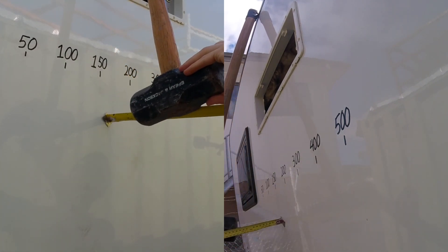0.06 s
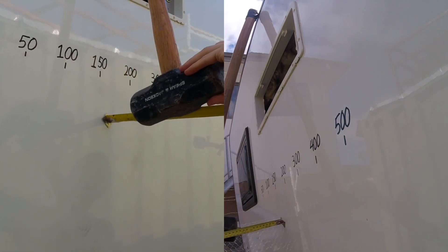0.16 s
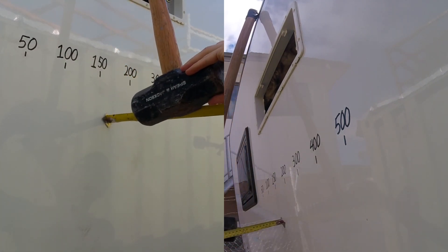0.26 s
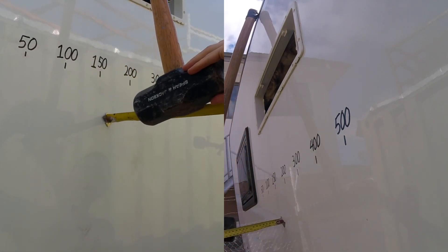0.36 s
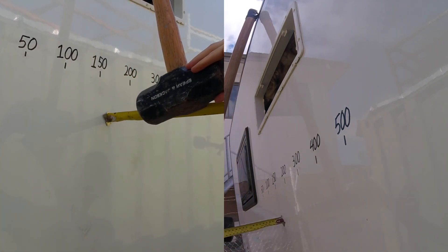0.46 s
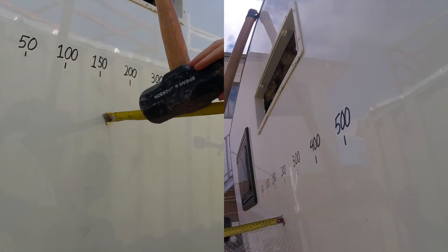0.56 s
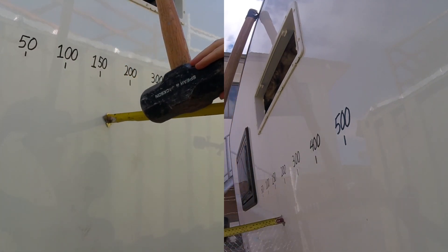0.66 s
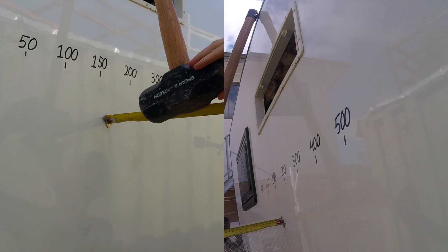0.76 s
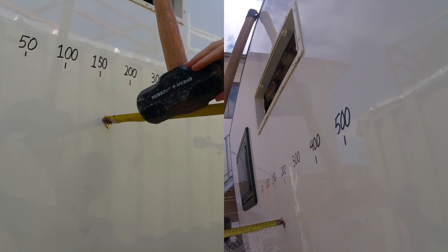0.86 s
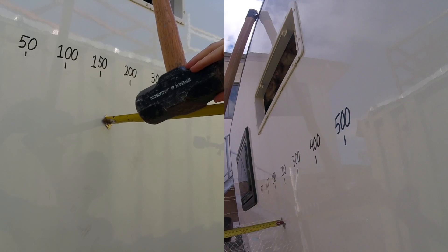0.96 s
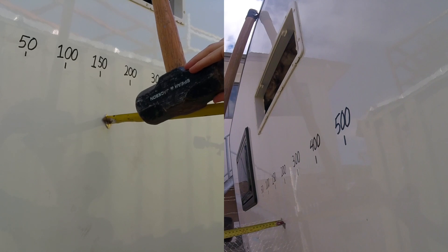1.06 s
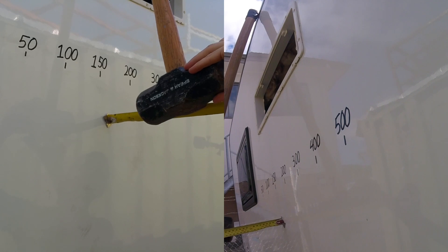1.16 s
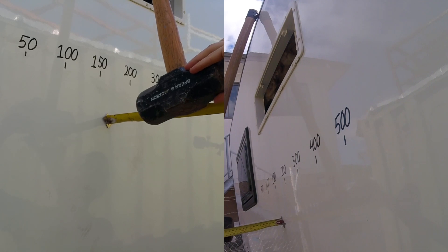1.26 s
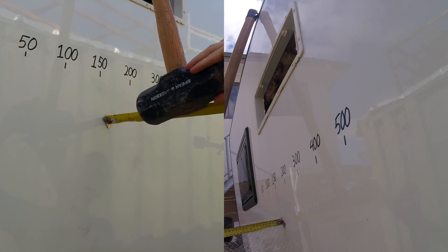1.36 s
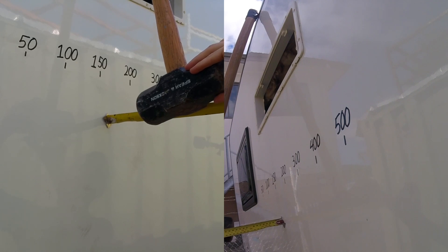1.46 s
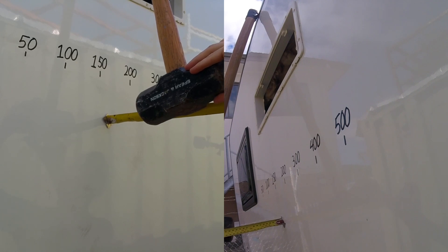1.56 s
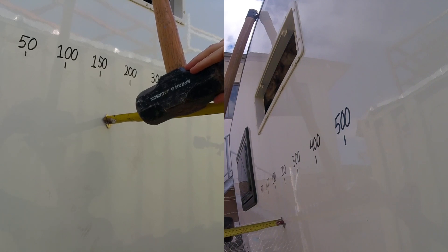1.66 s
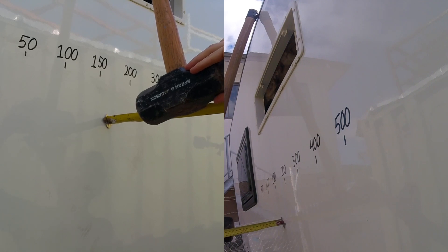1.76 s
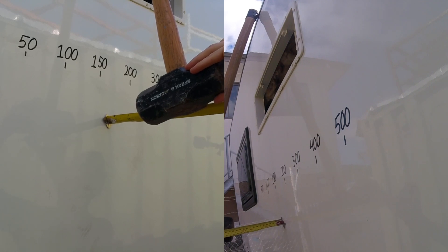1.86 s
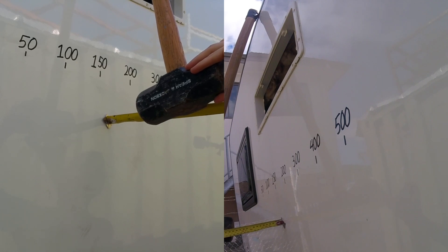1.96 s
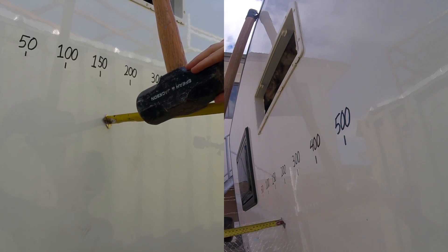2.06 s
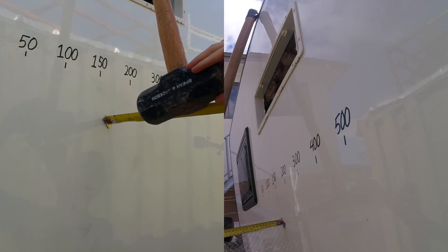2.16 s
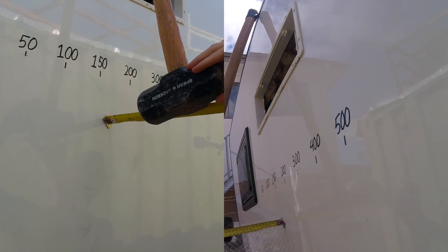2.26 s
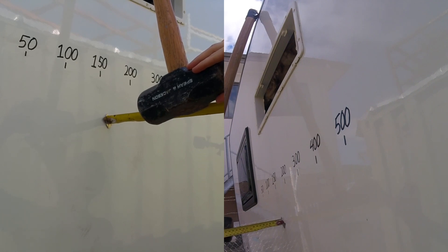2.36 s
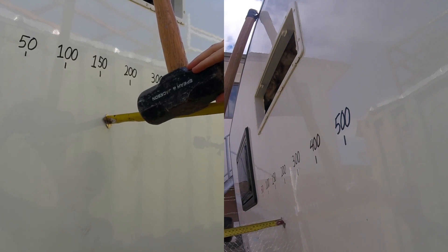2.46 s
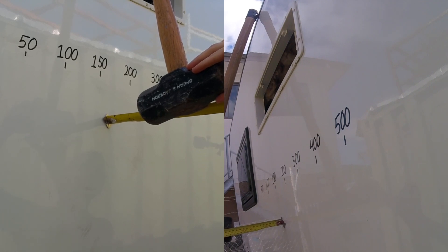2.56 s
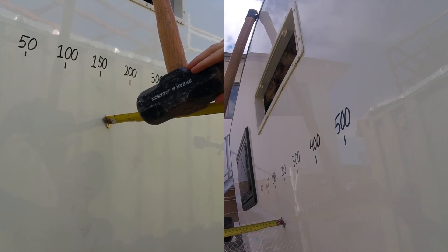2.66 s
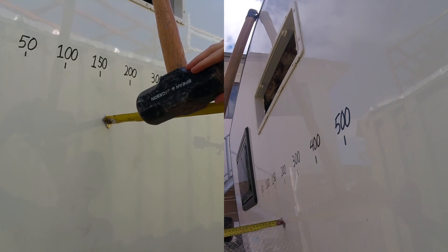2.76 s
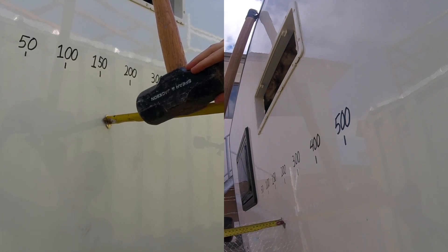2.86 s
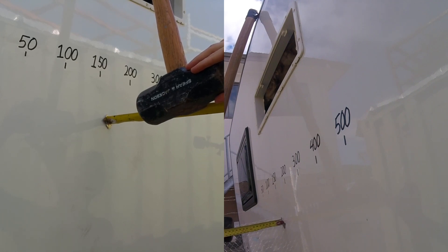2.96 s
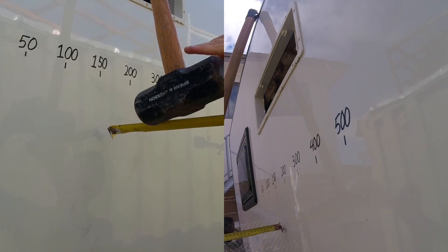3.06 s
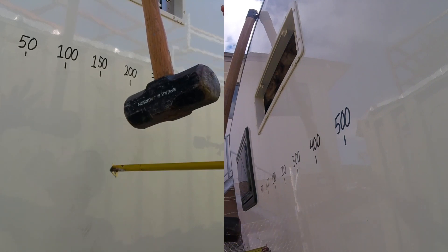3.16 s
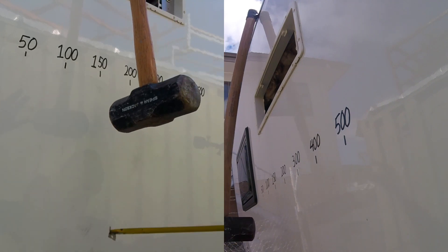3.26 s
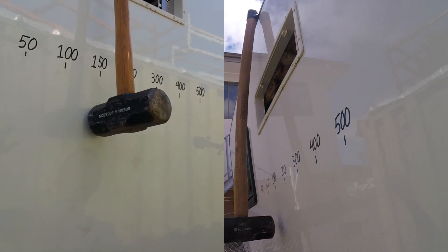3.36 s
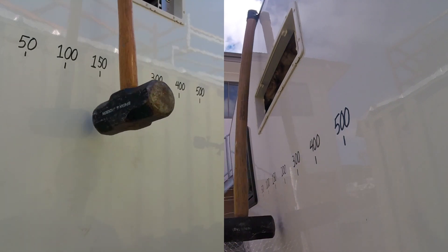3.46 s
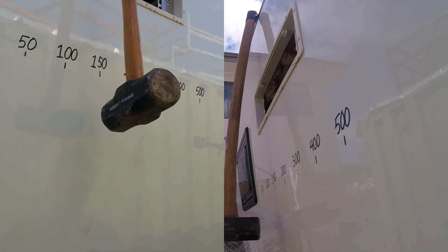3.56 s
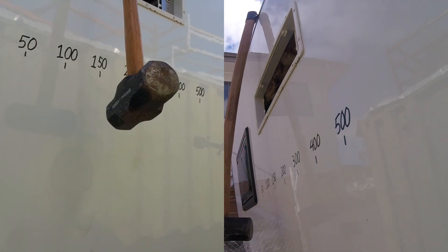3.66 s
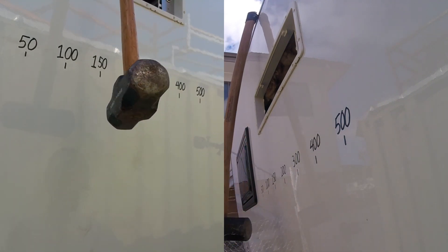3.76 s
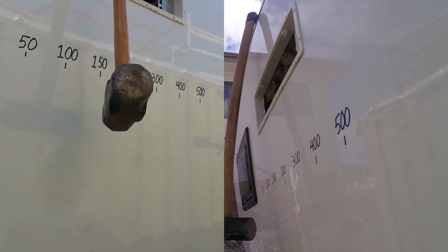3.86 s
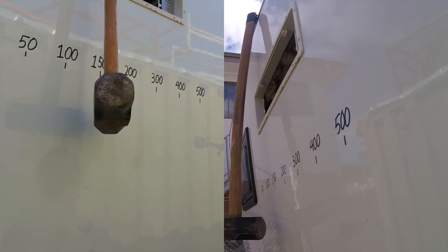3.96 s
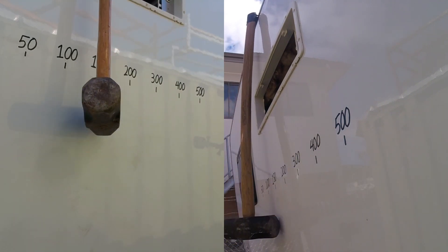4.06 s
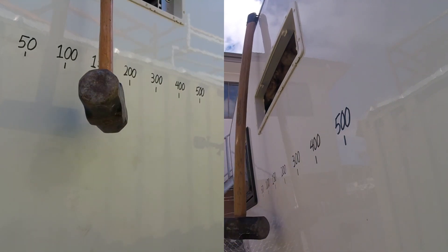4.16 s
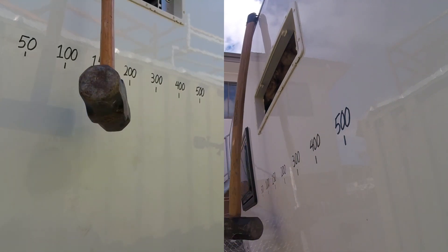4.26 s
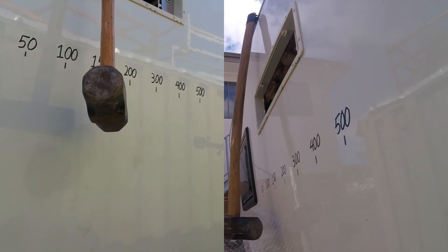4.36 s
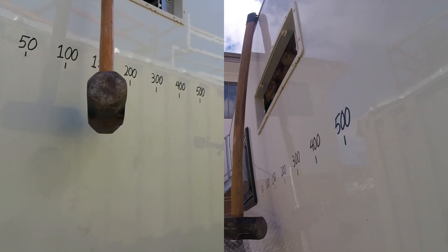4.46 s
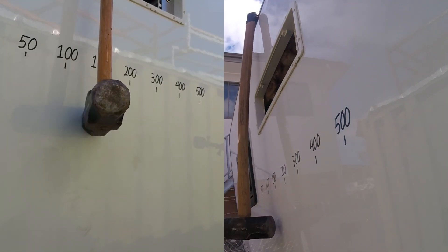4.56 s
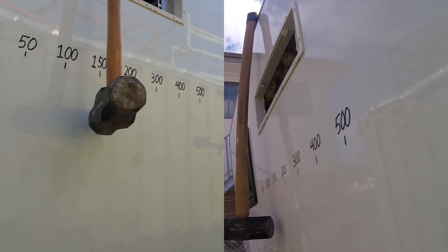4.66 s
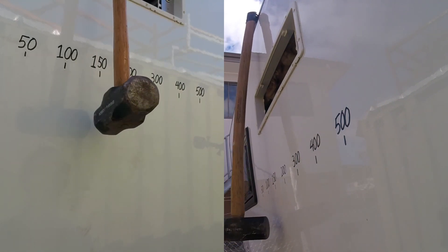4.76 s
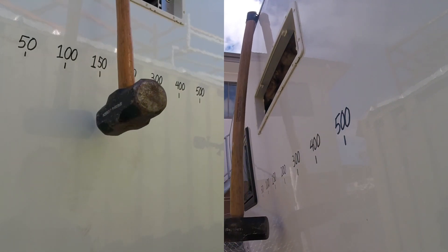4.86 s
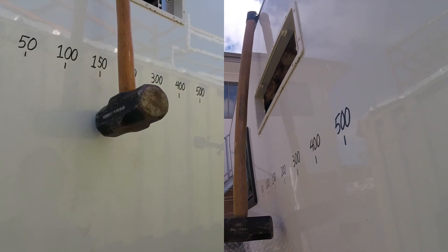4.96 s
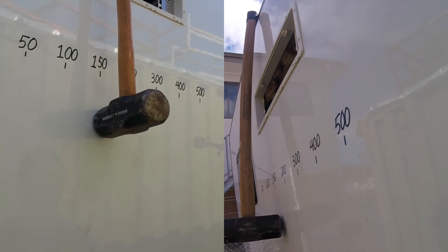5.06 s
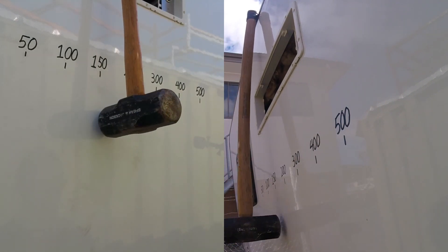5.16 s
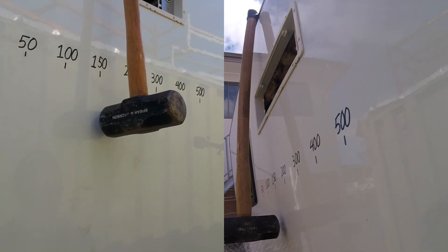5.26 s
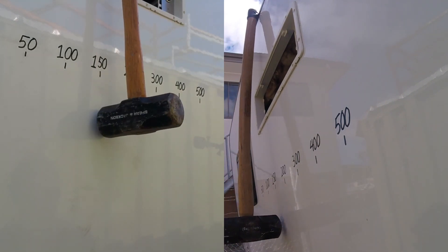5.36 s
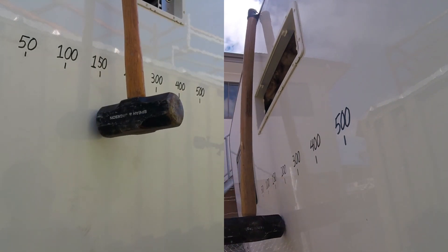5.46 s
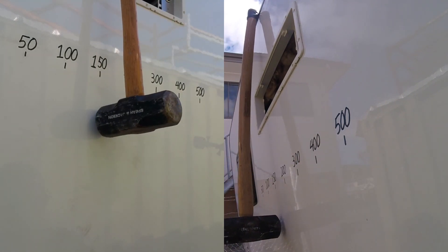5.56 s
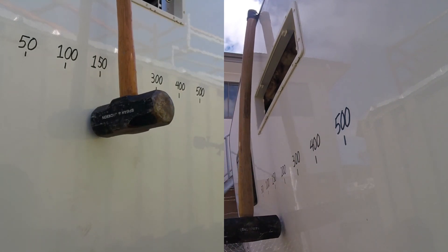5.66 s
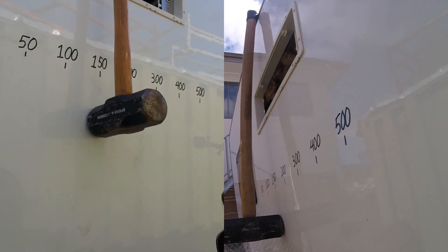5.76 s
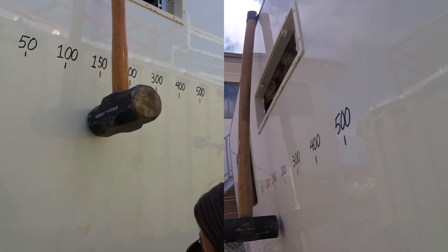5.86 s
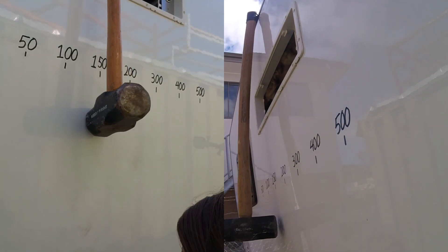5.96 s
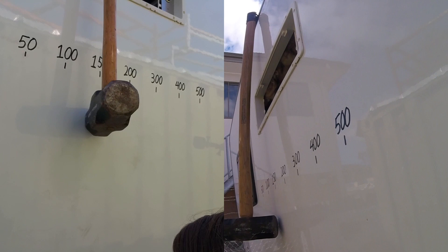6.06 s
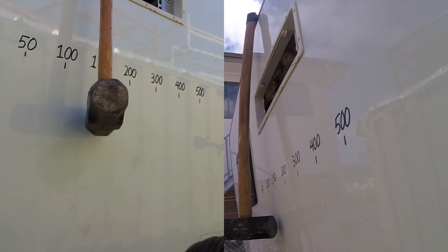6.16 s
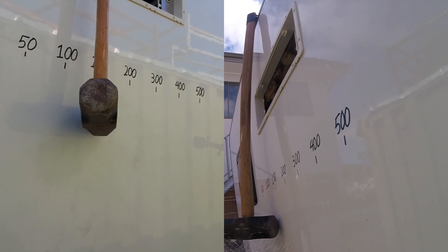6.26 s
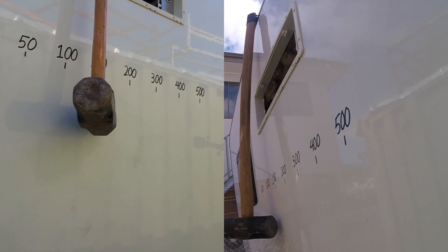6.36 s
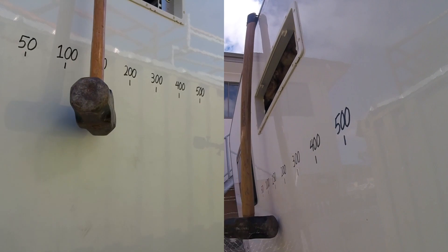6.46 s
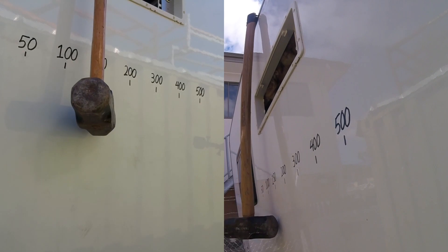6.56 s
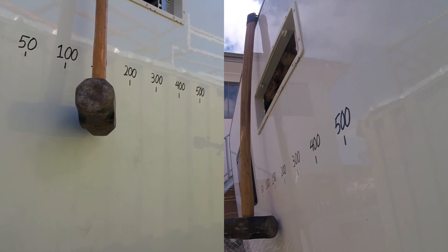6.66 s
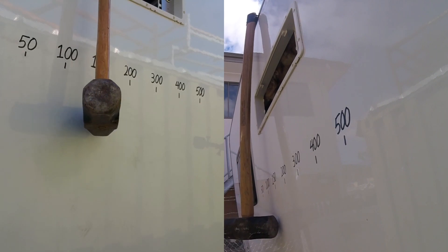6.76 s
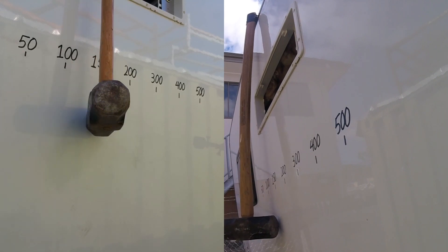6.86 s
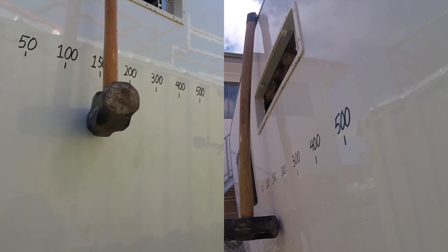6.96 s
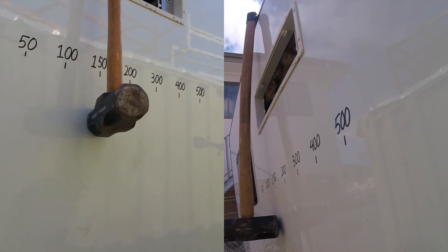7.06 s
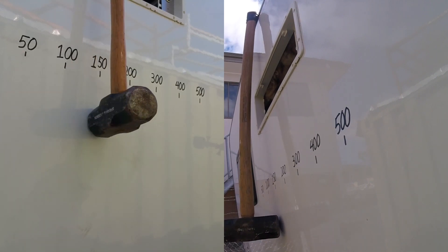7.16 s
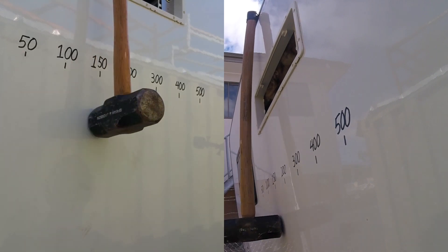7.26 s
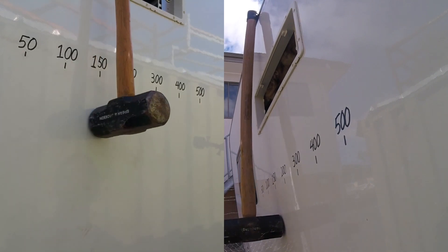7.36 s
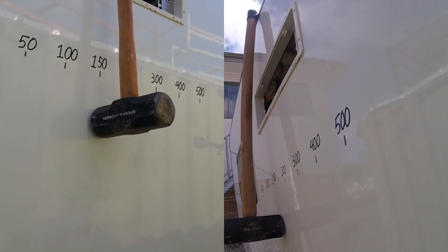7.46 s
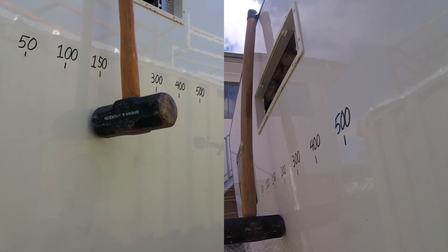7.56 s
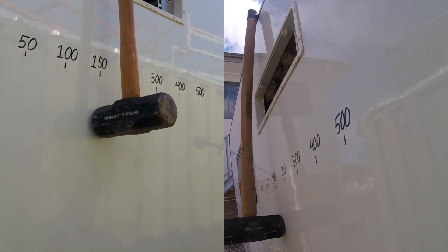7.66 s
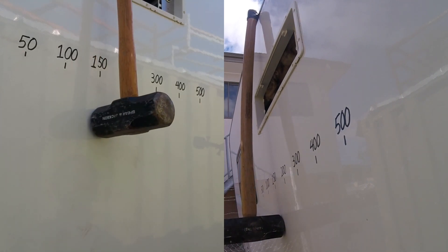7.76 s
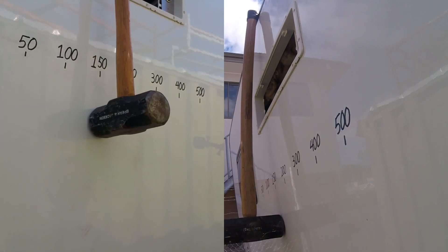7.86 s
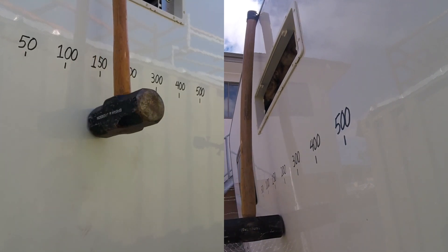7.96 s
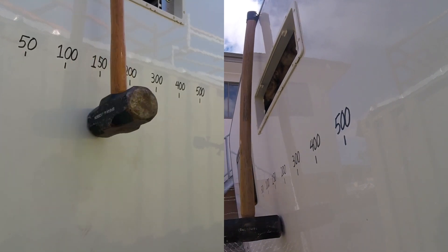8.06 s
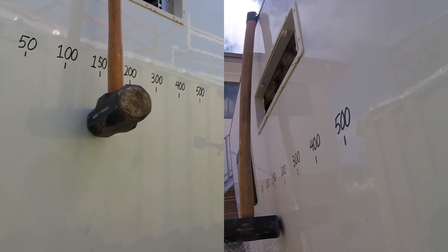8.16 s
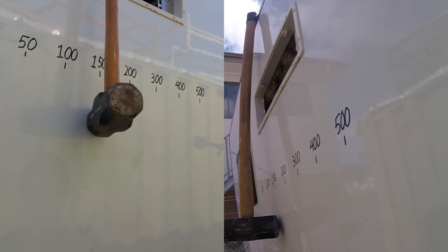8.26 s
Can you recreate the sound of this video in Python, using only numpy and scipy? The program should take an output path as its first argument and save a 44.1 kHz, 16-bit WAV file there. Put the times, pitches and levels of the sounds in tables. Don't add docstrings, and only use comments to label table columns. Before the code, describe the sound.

Over a faint outdoor hum, one loud hollow thump on a fibreglass panel is followed by quickening, fading knocks and small gritty ticks underfoot.

```python
import sys
import numpy as np
from scipy import signal
from scipy.fft import rfft, irfft
from scipy.io import wavfile
from scipy.ndimage import uniform_filter1d

SR = 44100
rng = np.random.default_rng(int(sys.argv[2]) if len(sys.argv) > 2 else 0)


def store_pcm(level_fs):
    pcm = np.round(np.clip(level_fs, -1, 1) * 32767).astype(np.int16)
    wavfile.write(sys.argv[1], SR, np.atleast_2d(pcm).T)


def invert_db(x):
    u = np.asarray(x, float) / 20
    return 10 ** u


N = 366471

# f/Hz, level/dB [per Hz]
WASH_SPECTRUM = [(30, -56), (55, -13), (95, -2.5), (140, -0.5), (230, -6.5), (420, -14), (800, -20.5),
                 (1600, -29), (3200, -38.5), (5000, -48.5), (7500, -60.5), (9500, -65.5), (12500, -59),
                 (15700, -61)]
# t/s, level/dB
BREEZE_LEVEL = [(0, 0.85), (3.4, -0.07), (5.2, 0.2), (5.9, 1.56), (7.3, 0.7), (8.31, 0.64)]
SECOND_MACHINE = [-50.5, -50]
# f/Hz, level/dB
WHINE_TONES = [(593.4, -66), (1090.6, -69), (1905, -79), (2000.6, -77), (2362.4, -76), (2514.8, -79),
               (3923, -86), (4039, -88)]
# start t/s, length t/s, pitch f/Hz, level/dB
SQUEAK_EVENTS = [
    (5.384, .1, 2203, -48),
    (5.484, 0.049, 2193, -47),
    (5.541, 0.025, 2240, -46.5),
    (5.64, .03, 2255, -52),
    (5.67, 0.029, 2268, -50),
]
# start t/s, length t/s, rub level/dB, hiss level/dB, where the sole presses hardest [0-1]
SCUFF_EVENTS = [
    (3.84, 0.22, -53, -65.5, 0.77),
    (5.448, 0.13, -44.5, -70.5, 0.5),
    (5.621, 0.13, -45, -70, 0.54),
    (7.24, 0.76, -42.5, -58.5, 0.28),
]
# f/Hz, level/dB [per Hz]
GRIT_SPECTRUM = [(400, -32), (700, 4), (900, 1), (1400, -3.5), (2000, -7.5), (3300, -9.5), (4500, -24),
                 (6500, -45), (12000, -83)]
# f/Hz, level/dB [per Hz]
DUST_SPECTRUM = [(2650, -9.5), (4500, -4), (6190, -6.5), (7020, -14), (9310, -20.5), (12100, -13.5),
                 (14900, -16), (15700, -16)]
# t/s, peak level/dB, centre f/Hz, breadth [octaves]
BRUSH_EVENTS = [(.24, -67, 6900, .67), (3.575, -43, 4000, 0.48), (3.622, -45, 3000, 0.71),
                (3.725, -59, 5000, 0.54), (3.839, -36.5, 1010, .6), (3.846, -49, 2400, 0.95),
                (3.897, -42.5, 2000, 0.7), (3.916, -48, 2460, .78), (3.994, -42, 2060, 0.28),
                (4.013, -40, 2000, 0.81), (4.036, -43, 1490, 1.1), (4.044, -39, 1260, 0.3),
                (5.505, -41, 1620, 0.23), (5.514, -50.5, 4300, 0.46), (5.655, -58, 3200, .71),
                (7.313, -56.5, 9000, 1.2), (7.362, -43, 3170, .3), (7.465, -35, 1090, 0.39),
                (7.505, -44, 2760, 0.79), (7.831, -47, 2880, .37), (8.105, -42.5, 2870, .57)]
# t/s, peak level/dB, centre f/Hz, breadth [octaves]
TICK_EVENTS = [(.086, -63, 7000, .89), (.121, -62, 9050, 1.2), (3.548, -39, 2970, 0.97),
               (4.052, -62, 14000, .4), (4.076, -66, 13900, 0.36), (4.154, -67, 12700, .6),
               (4.35, -68, 5800, 0.47), (5.488, -52.5, 2460, 0.85), (5.535, -46.5, 1300, 0.35),
               (5.682, -43, 2380, 0.23), (5.688, -31, 1600, .8), (5.7275, -30, 1090, 0.7),
               (5.944, -47, 3100, 0.48), (6.285, -45, 1490, 0.93), (7.307, -43, 2570, .82),
               (7.35, -40, 2350, 0.24), (7.384, -35, 830, 0.25), (7.386, -37, 1500, 1.07),
               (7.393, -27, 1400, 0.18), (7.432, -52, 1900, 1), (7.448, -34, 1400, .18),
               (7.474, -37, 1300, 0.54), (7.487, -34.5, 1290, 0.49), (7.548, -46, 1490, 1.1),
               (7.587, -31.5, 1300, 0.43), (7.609, -29, 1300, 0.49), (7.622, -46, 3770, 0.24),
               (8.104, -61, 11000, .8)]
# t/s, level/dB, t60 [s]
SNAP_EVENTS = [
    (3.5181, -21, .005),
    (3.5205, -26, 0.0092),
    (3.525, -39, .025),
    (3.53, -52.5, 0.48),
]
# f/Hz, level/dB [per Hz]
CRACK_SPECTRUM = [(1200, -28), (2000, 12), (3800, -22), (5600, 5.5), (7500, -7), (9500, -19), (12000, -5.5),
                  (15700, -17)]
# f/Hz, level/dB, t60 [s]
WALL_MODES = [(66.4, -2.5, 0.68), (83.8, 7.5, 0.35), (110.7, -4.5, 0.81)]
# f/Hz, level/dB, t60 [s]
THUD_MODES = [(180.3, -5, 0.11), (200, -8, 0.26), (235.9, -11.5, 0.17)]
# f/Hz, level/dB, t60 [s]
PANEL_MODES = [(305.6, -6, 0.14), (333.4, -0.5, 0.24), (376.4, -15, 0.18), (432.4, -10, 0.068),
               (470, -6, 0.13), (500.7, -5, 0.28), (507, -0.5, 0.11), (546.7, -2.5, 0.19), (616, -3, 0.16),
               (668, -6, .14), (693, -7.5, .13), (805, -19.5, 0.096)]
# f/Hz, level/dB, t60 [s]
SHELL_MODES = [(931, 7, 0.088), (1018, 9, 0.061), (1074, -9.5, 0.31), (1196, 2.5, 0.064),
               (1400, -29, 0.075), (1618, -11, 0.1), (2000, -17.5, 0.27)]
# f/Hz, level/dB [per Hz]
RATTLE_SPECTRUM = [(150, -29.5), (250, -4.5), (350, 0), (520, -6), (750, -9.5), (1100, -17.5), (2000, -23),
                   (3300, -32.5), (4300, -41.5), (8000, -67.5), (16000, -84.5)]
# f/Hz, t60 [s]
RATTLE_DECAY = [(300, 0.27), (1000, 0.31), (3000, 0.26), (6000, 0.31), (14000, 0.06)]
# f/Hz, level/dB [per Hz]
TRIM_SPECTRUM = [(2500, -17), (4300, -26.5), (4750, 4), (6200, -3.5), (6700, -11.5), (9500, -24.5),
                 (12000, -18), (15700, -24)]
# t/s, push level/dB, edge level/dB, trim buzz level/dB, push f/Hz
SLAP_EVENTS = [
    (3.550, -11.5, 4.5, -51, 187),
]
# t/s, push level/dB, edge level/dB [extra bite of the turning head's rim], trim buzz level/dB
KNOCK_EVENTS = [(3.518, -2.5, -4, -27), (4.175, -6, 1, -29), (4.706, -11, 4.5, -31),
                (5.189, -11.5, 3.5, -30.5), (5.552, -13.5, 0.5, -41.5), (5.868, -14.5, -3, -40),
                (6.15, -21, -1.5, -60), (6.378, -21, 1.5, -54), (6.555, -20.5, 0, -57),
                (6.699, -24, -1.5, -70), (6.827, -26, 1, -70), (6.95, -27, 1.5, -64),
                (7.069, -25.5, -5.5, -75), (7.194, -27.5, -12, -75), (7.295, -28, -2, -77),
                (7.376, -31, -9, -77), (7.456, -30, -1, -77), (7.515, -30.5, -12, -77),
                (8.001, -32, -18, -78)]


def evened(x):
    return x / np.sqrt(np.mean(abs(x) ** 2) + 1e-20)


def read(points, hz):
    f, value = np.transpose(points)
    return np.interp(np.log(hz + 1), np.log(f + 1), value)


def add(mix, s, sound):
    part = mix[round(s * SR):][:len(sound)]
    part += sound[:len(part)]


def coloured(x, points):
    gain = invert_db(read(points, np.fft.rfftfreq(len(x), 1 / SR)))
    return evened(irfft(rfft(x) * gain, len(x)))


def arch(u, top, narrow):
    top = np.clip(top, .05, .95)
    return ((u / top) ** top * ((1 - u) / (1 - top)) ** (1 - top)) ** narrow


def wash():
    rumble_db, rumble_follows, lump_db = -4.5, 1.6, 1.2
    hz = np.fft.rfftfreq(2048, 1 / SR)
    t = np.arange(N // 512 + 5) * 512 / SR
    a, b, patches = rng.standard_normal((len(t), len(hz), 3)).T
    patches = evened(uniform_filter1d(uniform_filter1d(patches, 6, 0), 10, 1))
    breeze_db = np.interp(t, *np.transpose(BREEZE_LEVEL))
    bass = 1 / (1 + (hz[:, None] / 250) ** 4)
    level_db = bass * (rumble_db + rumble_follows * breeze_db) + (1 - bass) * breeze_db
    level_db = level_db + (0.9 + lump_db * bass) * patches
    z = (a + 1j * b) * invert_db(read(WASH_SPECTRUM, hz)[:, None] + level_db)
    sound = signal.istft(z, nperseg=2048, noverlap=1536)[1][:N]
    return invert_db(-39.5) * evened(sound)


def hum():
    hum_hz, hum_db, beat_hz, beat_top_s = 195.76, -38, 2.335, 0.5316
    t = np.arange(N) / SR
    turn = 2 * np.pi * hum_hz * t
    faster = turn + 2 * np.pi * beat_hz * (t - beat_top_s)
    first = invert_db(hum_db) * np.sin(turn)
    second = sum(invert_db(db) * np.sin((k + 1) * faster) for k, db in enumerate(SECOND_MACHINE))
    whines = sum(invert_db(db) * np.sin(2 * np.pi * hz * t) for hz, db in WHINE_TONES)
    return np.sqrt(2) * (first + second + whines)


def squeak(s, length, hz, db):
    creep_hz_per_s = 210
    t = np.arange(0, length, 1 / SR)
    drift = uniform_filter1d(rng.standard_normal(SR // 2), size=300)
    wobble = 1 + 0.22 * evened(drift)[:len(t)]
    tone = np.sin(2 * np.pi * np.cumsum(hz + creep_hz_per_s * t) / SR)
    return s, np.sqrt(2) * invert_db(db) * wobble * arch(t / length, 0.58, 1.4) * tone


def scuff(s, length, rub_db, hiss_db, hardest):
    grit_db, grit_cap, flicker_db, grains_per_s = 2.6, 3.5, 2.0, 2500
    u = np.arange(0, length, 1 / SR) / length
    draws = rng.random((2, SR))[:, :len(u)]
    size_db = grit_db * np.minimum(-np.log(draws[0] + 1e-9), grit_cap)
    size = invert_db(size_db) * (draws[1] < grains_per_s / SR)
    stone = rng.integers(0, 24, SR)[:len(u)]
    t = np.arange(600) / SR
    rings = np.zeros(len(u))
    for k, hz in enumerate(np.geomspace(600, 6000, 24)):
        grain = np.sin(2 * np.pi * hz * t) * np.exp(-t * hz / 4.3) * hz
        rings += signal.oaconvolve(size * (stone == k), grain)[:len(u)]
    a, b = rng.standard_normal((2, SR))[:, :len(u)]
    dust = invert_db(flicker_db * evened(uniform_filter1d(a, size=600))) * coloured(b, DUST_SPECTRUM)
    rub = invert_db(rub_db) * arch(u, hardest, 6.5) * coloured(rings, GRIT_SPECTRUM)
    hiss = invert_db(hiss_db) * arch(u, 0.38, 2.7) * dust
    return s, rub + hiss


def tick(s, peak_db, hz, octaves, t60, rise):
    t = np.arange(SR // 6) / SR
    steps = np.linspace(-3, 3, 13)
    octaves, rise = max(octaves, .1), max(rise, .0002)
    band = np.transpose([hz * 2 ** (steps * octaves), -6 * steps ** 2])
    shape = invert_db(peak_db - 60 * t / max(t60, .005)) * (1 - np.exp(-t / rise))
    shape = shape * (1 + 0.87 * np.exp(-t / 0.00073 - rise / 0.00098))
    width = 0.457 / (hz * octaves)
    late = t - 1.62 * width - rise
    pip = 3.04 * np.exp(-rise / 0.00061 - (late / width) ** 2) * np.cos(2 * np.pi * hz * late)
    return s, shape * coloured(rng.standard_normal(len(t)), band) + invert_db(peak_db) * pip


def sudden_tick(*event):
    return tick(*event, t60=0.036, rise=.0007)


def brush(*event):
    return tick(*event, t60=0.075, rise=0.0036)


def snap(s, db, t60):
    t = np.arange(SR // 10) / SR
    return s, invert_db(db - 60 * t / t60) * coloured(rng.standard_normal(len(t)), CRACK_SPECTRUM)


def push(t, hz, cycles):
    u = t * hz / cycles
    return (u * np.exp(1 - u)) ** 2.3 * np.sin(2 * np.pi * hz * t + 0.62 * np.exp(-u) - .6)


def ring(modes, t, detune, rise_cycles):
    spot_db = 1.5
    hz, db, t60 = np.transpose(modes)[:, :, None]
    a, b, c = rng.standard_normal((3, len(modes), 1))
    rise = 1 - np.exp(-t * hz / max(rise_cycles, .05))
    level = invert_db(db + spot_db * a - 60 * t / t60) * rise
    sound = (level * np.sin(2 * np.pi * hz * (1 + detune * b) * t + c)).sum(0)
    return sound / abs(sound).max()


def rattle(t):
    noise = coloured(rng.standard_normal(len(t)), RATTLE_SPECTRUM)
    hz, frames, z = signal.stft(noise, SR, nperseg=256)
    decay = invert_db(-60 * frames / read(RATTLE_DECAY, hz)[:, None])
    tail = signal.istft(z * decay, SR, nperseg=256)[1][:len(t)]
    return tail * (1 - np.exp(-t / 0.003))


def trim_buzz(t, db):
    noise = coloured(rng.standard_normal(len(t)), TRIM_SPECTRUM)
    return invert_db(db - 15.0 - 60 * t / 0.17) * noise * (1 - np.exp(-t / 0.0015))


def knock(s, push_db, edge_db, sizzle_db, push_hz=None):
    rest_hz, stretch_hz = 113.3, 51.4
    t = np.arange(SR // 2) / SR
    push_hz = push_hz or rest_hz + stretch_hz * invert_db(push_db) ** 2
    cycles = 1.47 + 0.0056 * (145 - push_hz)
    panel_db = push_db - 4 + 0.39 * edge_db
    shell_db = push_db - 10.5 + 0.98 * edge_db
    boom = invert_db(-11.5) * ring(WALL_MODES, t, 0.023, 0.18)
    low = invert_db(push_db) * (push(t, push_hz, cycles) + boom)
    thud = invert_db(-1.0) * ring(THUD_MODES, t, 0.021, 1.57)
    panel = invert_db(-1.0) * ring(PANEL_MODES, t, 0.023, 2.3)
    mid = invert_db(panel_db) * (thud + panel)
    shell = invert_db(-4.5) * ring(SHELL_MODES, t, 0.025, 2.4)
    high = invert_db(shell_db) * (shell + invert_db(-3.0) * rattle(t))
    return s, low + mid + high + trim_buzz(t, sizzle_db)


def scene():
    mix = wash() + hum()
    sources = ((squeak, SQUEAK_EVENTS), (scuff, SCUFF_EVENTS), (brush, BRUSH_EVENTS),
               (sudden_tick, TICK_EVENTS), (snap, SNAP_EVENTS), (knock, SLAP_EVENTS), (knock, KNOCK_EVENTS))
    for source, events in sources:
        for event in events:
            add(mix, *source(*event))
    return mix[None]


def roll_off(x):
    return signal.sosfilt(signal.butter(12, 16650, fs=SR, output="sos"), x)


def record(dry):
    low_cut_hz, band_edge_hz = 50, 15760
    duck_knee_db, duck_share, duck_memory_s, duck_lag_s = -24, 0.81, 0.66, 0.18
    thin = signal.sosfilt(signal.butter(3, low_cut_hz, "high", fs=SR, output="sos"), dry)
    keep = np.exp(-1 / (duck_memory_s * SR))
    heard_db = 10 * np.log10(signal.lfilter([1 - keep], [1, -keep], thin ** 2) + 1e-12)
    over_db = np.maximum(heard_db - duck_knee_db, 0)
    lag = np.exp(-1 / (duck_lag_s * SR))
    ducked = thin / invert_db(duck_share * signal.lfilter([1 - lag], [1, -lag], over_db))
    limited = 1.5 * np.tanh(ducked / 1.496)
    edge = signal.firwin(1023, band_edge_hz, window=("kaiser", 9), fs=SR)
    finished = signal.oaconvolve(limited, edge[None], "same")
    return roll_off(finished)


dry = scene()
out = record(dry)
store_pcm(out)
```